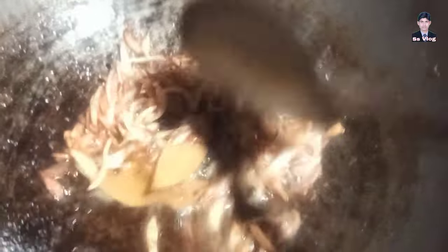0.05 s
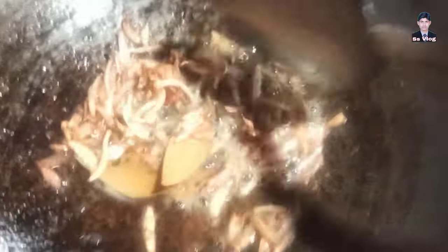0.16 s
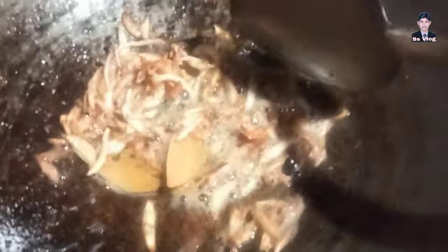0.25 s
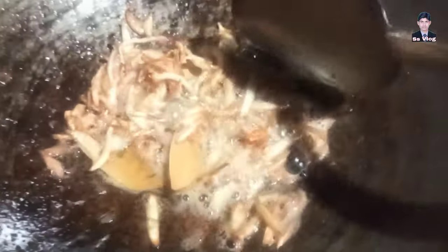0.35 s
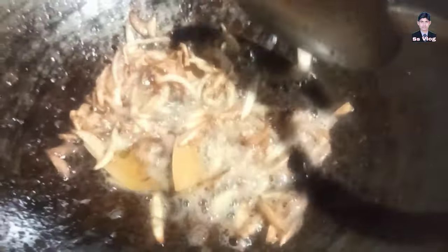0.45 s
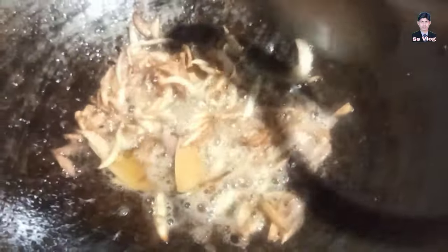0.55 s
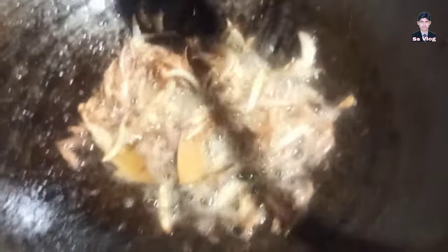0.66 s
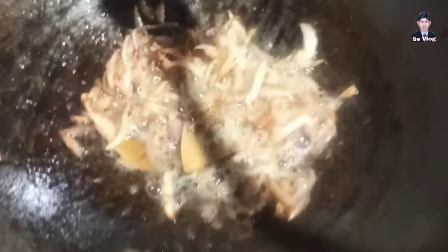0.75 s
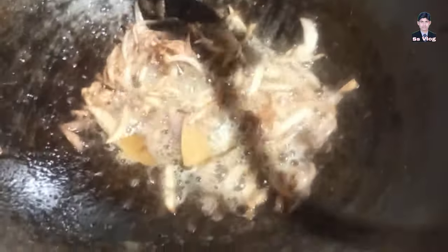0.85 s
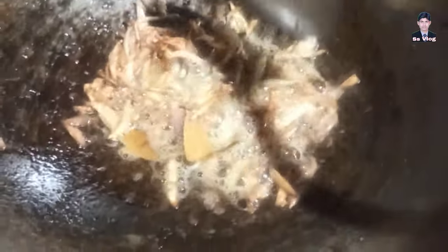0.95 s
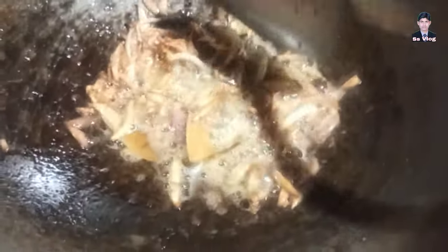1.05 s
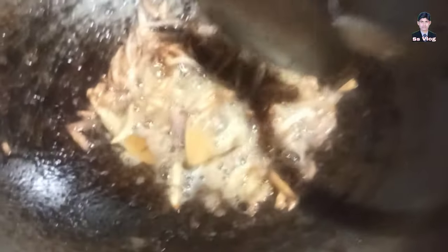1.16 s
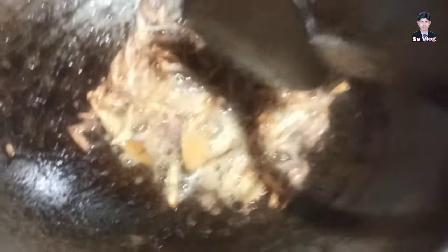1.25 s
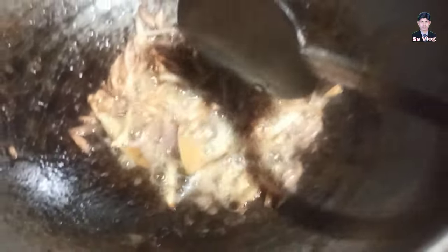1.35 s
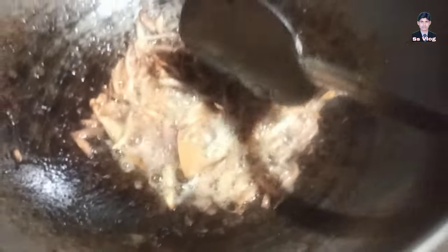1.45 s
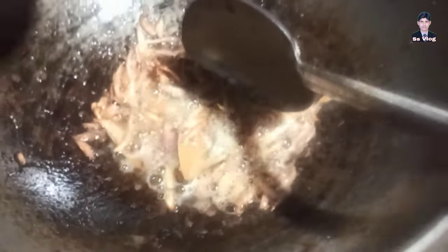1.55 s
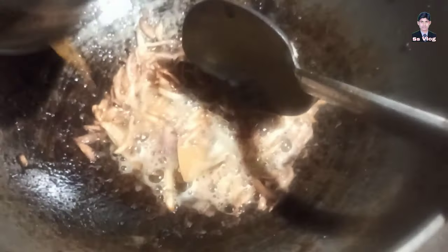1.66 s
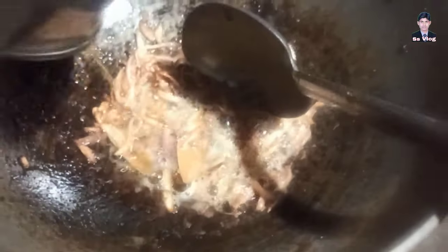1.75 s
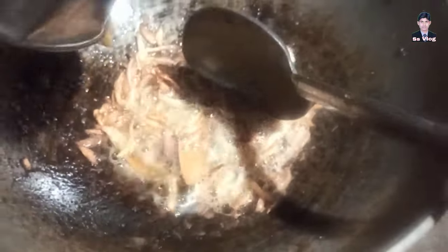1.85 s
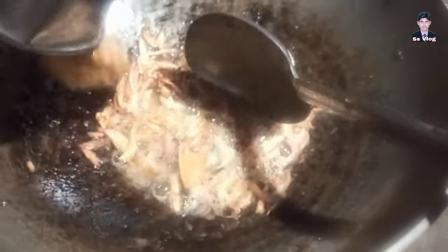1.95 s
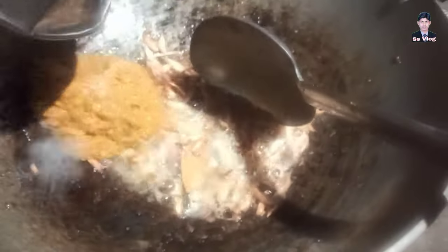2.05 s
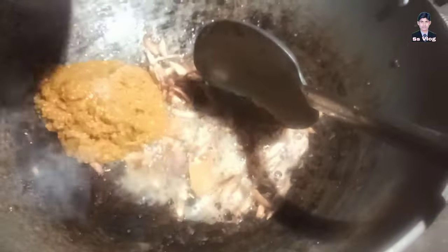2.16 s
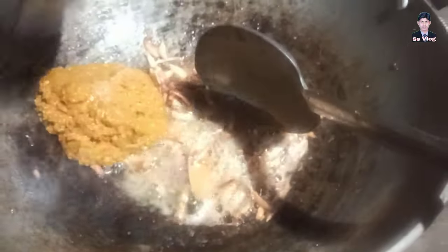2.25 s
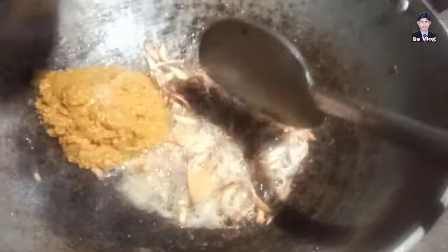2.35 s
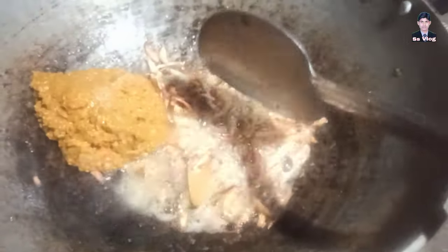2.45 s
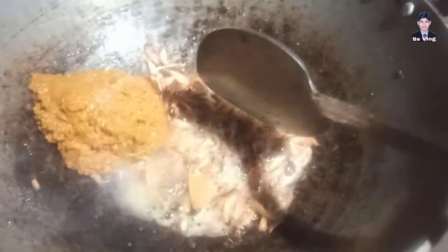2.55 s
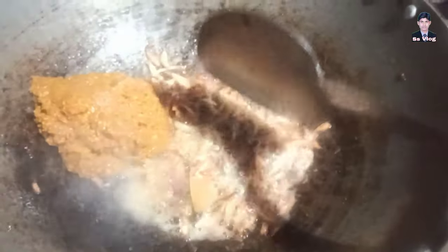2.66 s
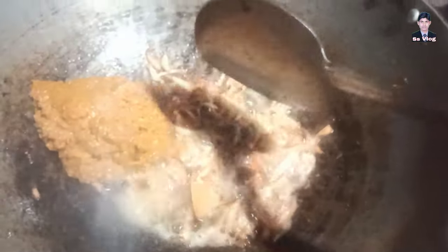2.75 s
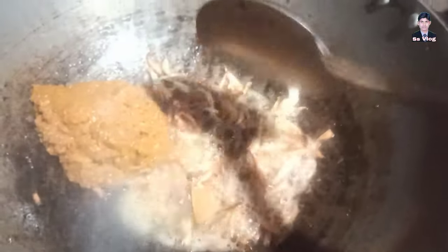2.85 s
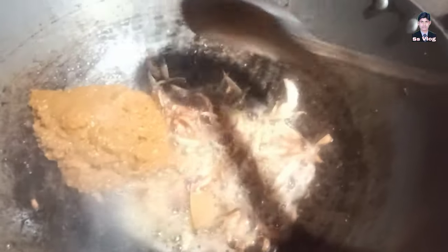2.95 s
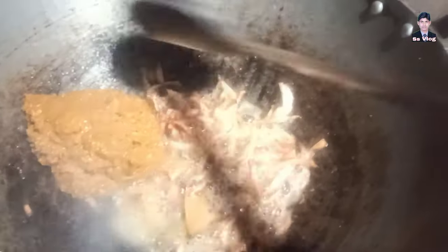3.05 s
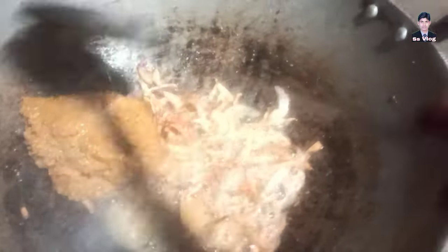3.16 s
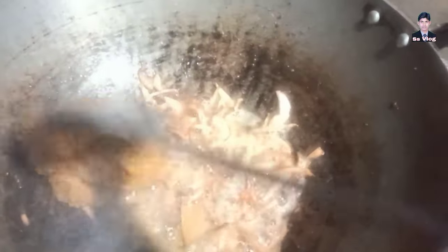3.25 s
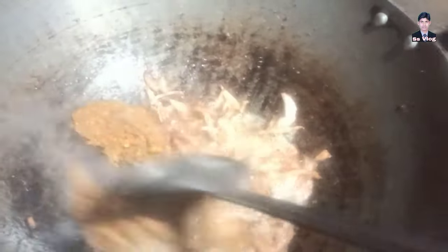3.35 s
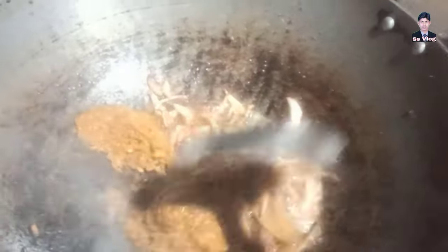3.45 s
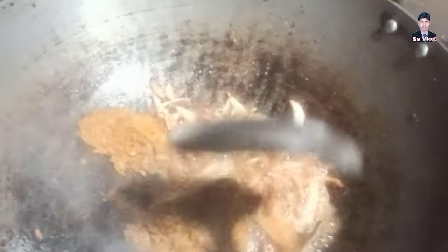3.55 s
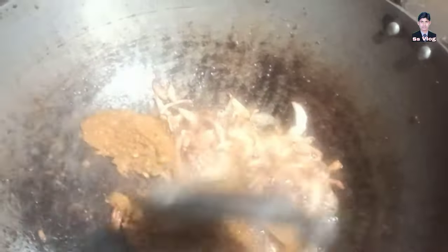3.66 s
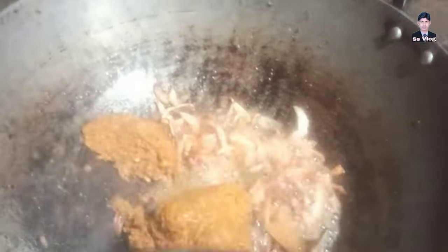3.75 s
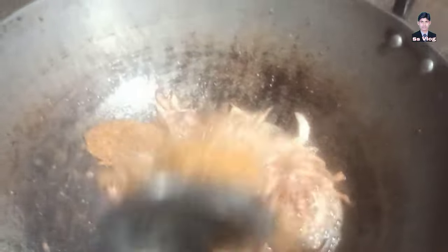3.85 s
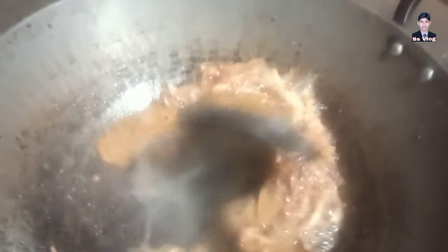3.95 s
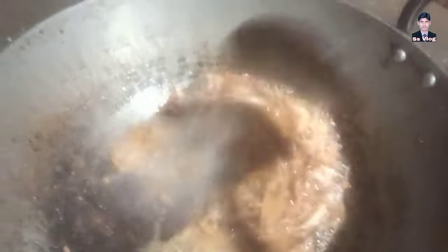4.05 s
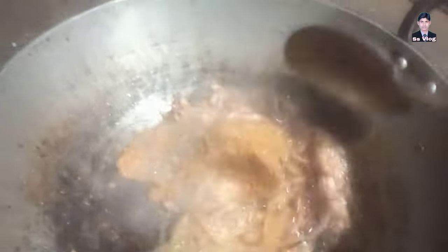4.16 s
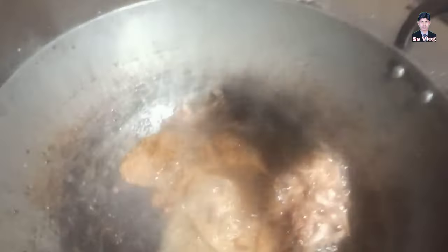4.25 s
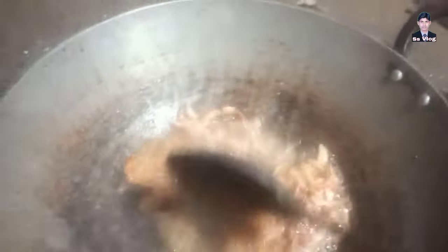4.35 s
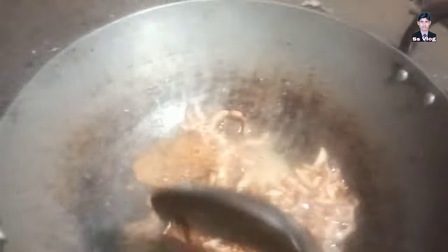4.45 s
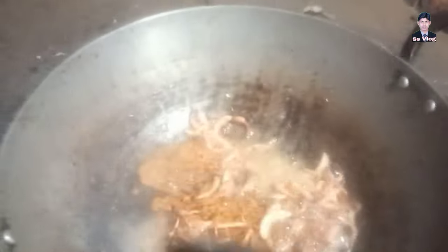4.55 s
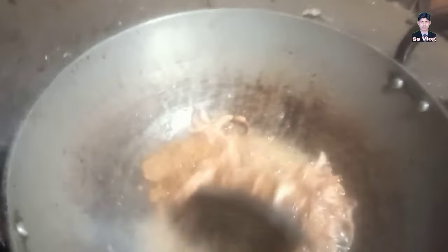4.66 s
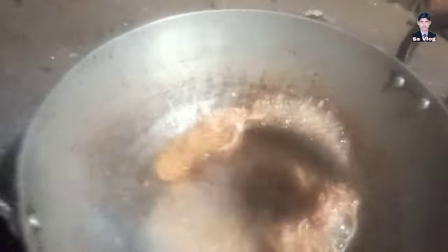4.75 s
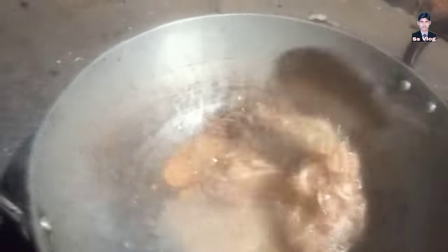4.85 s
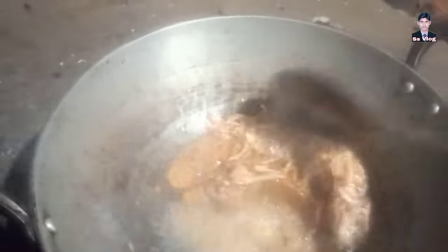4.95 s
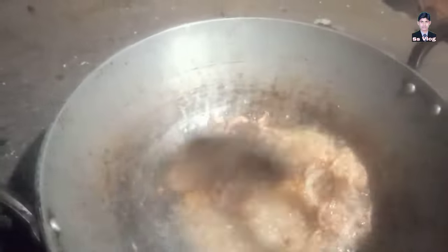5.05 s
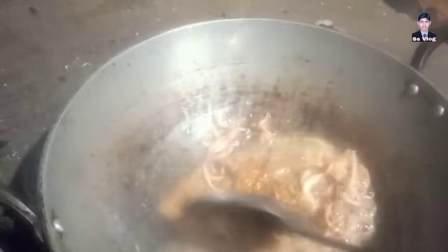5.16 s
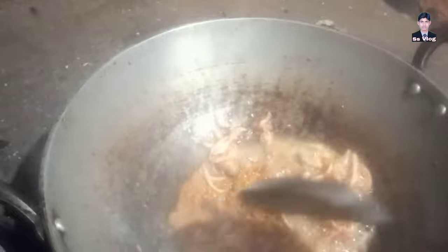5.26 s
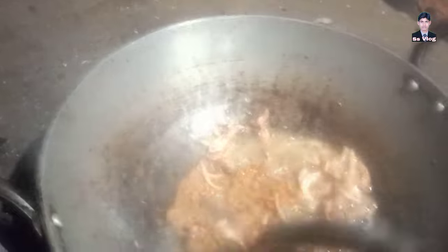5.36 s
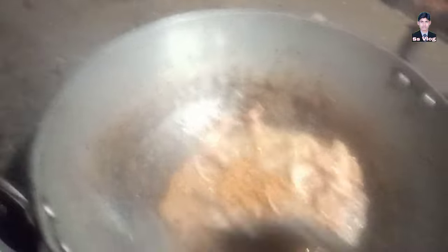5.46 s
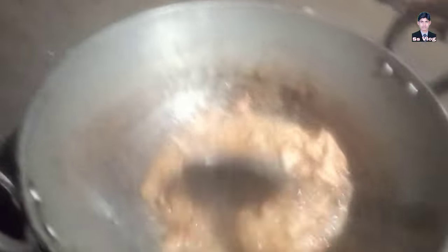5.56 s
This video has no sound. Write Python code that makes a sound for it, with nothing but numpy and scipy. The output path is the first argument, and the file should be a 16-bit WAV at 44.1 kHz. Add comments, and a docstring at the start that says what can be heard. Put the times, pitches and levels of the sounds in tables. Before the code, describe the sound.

Quiet close frying with faint ladle ticks and rapid chirps bursts into a loud, spitting sizzle as paste lands and is stirred with hard metallic knocks.

```python
"""Close on a steel wok: onions fry softly in oil over a low kitchen rush, both as shaped noise.
An insect chirps in double pips (falling tones), and a ladle rubs, ticks and knocks (damped pan modes).
At about two seconds a lump of wet paste knocks into the pan and flares into a crackling sizzle, of random
noise bursts, with bubbling beneath and spits of oil (short rings with noise). Past three seconds the ladle
knocks harder, scrapes and stirs, the wok shifts with dull thuds, and towards the end the paste dries."""
import sys
import numpy as np
from scipy import signal
from scipy.fft import rfft, irfft, next_fast_len
from scipy.io import wavfile
from scipy.ndimage import uniform_filter1d, map_coordinates

SR = 44100
rng = np.random.default_rng(int(sys.argv[2]) if len(sys.argv) > 2 else 0)


def generate_wav(signal):
    """Clip the signal to [-1, 1] and save it as 16-bit WAV at the path in sys.argv[1]."""
    frames = np.transpose(np.atleast_2d(signal))
    scaled = np.clip(frames, -1, 1) * 32767
    pcm = np.round(scaled).astype(np.int16)
    wavfile.write(sys.argv[1], SR, pcm)


N = 246519  # length in samples

# Ladle on the pan, and at 2.168 s the lump of paste landing.
# Each row: start in seconds, peak level in dB, contact time in ms.
KNOCKS = [(0.2353, -30.5, 2.7), (0.884, -38, 4.4), (2.168, -30, 1.4), (3.1981, -1.5, 0.48),
          (3.392, -12, 1.3), (3.493, -12, 2.4), (3.795, -25, 1.8), (3.911, -9.5, 0.55), (4.324, -11.5, 1.8),
          (4.7345, -6, 1.67), (5.1, -12.5, 2.14)]

TOP_HZ = 15650  # upper band limit of the recorder
LAND_S = 2.1  # the paste begins to heat
DRY_FROM_S = 4.39  # once spread out, the paste loses its water
LUMP_DB = -21  # fizz of the resting lump


def amp(db):
    """Decibels to gain."""
    return 10 ** (np.asarray(db) / 20)


def unit(x):
    """Scale to rms 1."""
    return x / np.sqrt(np.mean(x ** 2) + 1e-20)


def wobble(rate):
    """A smooth random curve, rate knots a second."""
    knots = rng.standard_normal(int(N * rate / SR) + 4)
    return map_coordinates(knots, [np.arange(N) * rate / SR])


def add(track, s, sound):
    """Mix a sound in at time s."""
    part = track[max(0, round(s * SR)):][:len(sound)]
    part += sound[:len(part)]


def since(s):
    """Seconds gone by since time s, zero before it."""
    return np.maximum(np.arange(N) / SR - s, 0)


def swell(s, attack, hold, release):
    """Gain that rises from time s, holds, then dies away (all in seconds)."""
    return np.minimum(since(s) / attack, 1) * np.exp(-since(s + attack + hold) / release)


def colour(x, points, size=4096):
    """Causal minimum-phase filter with the given (Hz, dB) spectrum."""
    hz, db = np.transpose(points)
    log_bins = np.log(np.fft.rfftfreq(size, 1 / SR) + 1)
    gain = amp(np.interp(log_bins, np.log(hz), db))
    # folding the cepstrum forward makes the filter causal
    cepstrum = irfft(np.log(gain))
    cepstrum[1:size // 2] *= 2
    cepstrum[size // 2 + 1:] = 0
    impulse = irfft(np.exp(rfft(cepstrum)))
    return signal.fftconvolve(x, impulse)[:N]


def crackle(rate, spread_db, life, hiss_db):
    """Bursts of uneven size, each a tiny dying puff (life in s), over the hiss of countless smaller ones."""
    size = amp(spread_db * np.minimum(rng.standard_normal(N), 2.1))
    bursts = (rng.random(N) < rate / SR) * size ** 2 / rate
    power = signal.lfilter([1], [1, -np.exp(-2 / (life * SR))], bursts)
    envelope = np.sqrt(power / power.mean() + amp(hiss_db) ** 2)
    return unit(envelope * rng.standard_normal(N))


def onions():
    """A fine, even frying: dense small bursts, coloured, with a very slight wobble in level."""
    # Each row: frequency in Hz, level in dB per Hz.
    onion_tone = [(40, -40), (150, -8), (300, -7.5), (430, -5.5), (650, -3), (900, -9.5), (1200, -7.5),
                  (1900, -11.5), (2800, -9.5), (3700, -1.5), (5300, -4.5), (7000, 1.5), (8600, -8.5),
                  (15000, -15.5)]
    grains = crackle(rate=2500, spread_db=1.5, life=0.00057, hiss_db=4.5)
    return amp(-42 + 0.13 * wobble(14.0)) * unit(colour(grains, onion_tone))


def room():
    """The low, steady rush of the stove and kitchen, as coloured noise."""
    # Each row: frequency in Hz, level in dB per Hz.
    room_tone = [(25, -43), (45, -24), (75, -2), (115, 2), (170, -6), (300, -11), (900, -35), (4000, -60)]
    return amp(-58.0) * unit(colour(rng.standard_normal(N), room_tone, size=16384))


def insect(pip_hz=6680, fall_hz_per_s=110000, width=0.0017, gap=.0178, wet_db=-4, t60=0.17):
    """Two wing strokes a chirp, each a short falling pip; nearby walls answer."""
    # Insect chirps. Each row: start in seconds, level in dB before each pip's own offset.
    chirps = [(0.2299, -29.5), (0.3689, -28), (0.46, -27), (0.5777, -26), (0.6886, -28), (0.793, -27.5),
              (0.9058, -24), (1.0212, -25.5), (1.1302, -26), (1.234, -25), (1.3494, -24.5), (1.4626, -24),
              (1.5835, -27), (1.699, -26.5), (1.8166, -25.5), (1.9207, -30)]
    first_pip_db, second_pip_db = -3, -1.5  # the two wing strokes
    out = np.zeros(N)
    t = np.arange(-SR // 200, SR // 200) / SR
    late = np.arange(SR // 8) / SR
    for s, chirp_db in chirps:
        for at, db in ((s, chirp_db + first_pip_db), (s + gap, chirp_db + second_pip_db)):
            # halved because a phase of hz * t falls twice as fast in pitch
            hz = pip_hz + 50 * rng.standard_normal() - fall_hz_per_s * t / 2
            envelope = np.exp(-(t / (width * rng.uniform(0.87, 1.14))) ** 2 / 2)
            pip = envelope * np.sin(2 * np.pi * hz * t)
            walls = rng.standard_normal(len(late)) * amp(-60 * late / t60) * (late > .002)
            walls *= amp(wet_db) / np.linalg.norm(walls)
            walls[0] = 1  # the direct sound
            add(out, at + t[0], amp(db) * signal.fftconvolve(pip, walls))
    return out


def scratches(sharpness=6):
    """The ladle's edge rubs the steel: fast, rough slips excite one resonance of the ladle."""
    # Each row: middle in seconds, rms level in dB before the stroke's taper, pitch in Hz, length in seconds.
    rubs = [(0.236, -38, 3600, 0.0086), (0.255, -43, 13000, .05), (0.621, -52, 514, .02),
            (0.695, -41, 3000, 0.017), (3.232, -23.5, 2400, 0.027), (3.311, -23.5, 2760, 0.027),
            (3.345, -28.5, 1240, .035), (3.379, -21.5, 4170, .09), (3.582, -27, 3480, 0.045),
            (3.67, -25, 4760, 0.13)]
    out = np.zeros(N)
    slips = crackle(rate=1200, spread_db=4, life=.0005, hiss_db=-8)
    for s, db, hz, length in rubs:
        stroke = np.hanning(int(length * SR))
        rough = slips[int(s * SR):][:len(stroke)]
        rasp = signal.lfilter(*signal.iirpeak(hz, sharpness, SR), rough)
        add(out, s - length / 2, amp(db) * stroke * unit(rasp))
    return out


def pan_ring():
    """The pan's short answer to a push, at new mode strengths each time."""
    # Modes of the loaded pan. Each row: frequency in Hz, mean level in dB, 60 dB decay time in seconds.
    modes = [(260, -11.5, 0.084), (328, 4.5, 0.025), (460, 8.5, 0.014), (595, 9.5, 0.023),
             (815, 11.5, 0.0061), (1190, -25, .014)]
    t = np.arange(SR // 10) / SR
    ring = np.zeros(len(t))
    for hz, db, t60 in modes:
        ring += amp(db + rng.standard_normal() - 60 * t / t60) * np.cos(2 * np.pi * hz * t)
    # an open bowl radiates little bass
    return signal.sosfilt(signal.butter(1, 170, "high", fs=SR, output="sos"), ring)


def knocks():
    """Ladle and lump push the pan's modes; food cushions them: a longer contact gives a duller knock."""
    out = np.zeros(N)
    for s, db, contact_ms in KNOCKS:
        push = np.hanning(max(3, int(contact_ms * SR / 1000)))
        knock = np.convolve(push, pan_ring())
        add(out, s, amp(db) * knock / abs(knock).max())
    return out


def scrape():
    """Sticking and slipping after each knock and in the ladle's long push shakes the pan's low modes."""
    drag_db, drag_fade_db_per_s = -23, 193  # level relative to the knock
    push_s, push_db = 3.31, -27  # one long push through the lump
    slip_tone = [(80, -19), (240, 3), (450, -1.5), (1200, -6.5), (3000, 2)]  # Hz, dB per Hz
    slips = colour(crackle(rate=500, spread_db=3.5, life=0.0011, hiss_db=-0.5), slip_tone)
    push = amp(push_db) * swell(push_s, attack=0.052, hold=0.083, release=0.072)
    drags = np.zeros(N)
    for s, db, _ in KNOCKS:
        drags += (since(s) > 0) * amp(db + drag_db - drag_fade_db_per_s * since(s))
    rubbing = unit(signal.fftconvolve(slips, pan_ring())[:N])
    return np.hypot(push, drags) * rubbing


def ticks_and_spits(count=50):
    """Ladle ticks and bursting oil droplets: a noise tick and a very short ring, each at its own pitch."""
    # Ladle ticks (the first three rows), then single spits of oil.
    # Each row: start in seconds, peak level in dB, pitch in Hz.
    placed = [(0.238, -21, 13100), (.4045, -21, 13100), (0.886, -28, 13600), (2.0235, -10, 7500),
              (2.045, -14.5, 4600), (2.129, -14, 4060), (2.2367, -11, 7250), (2.277, -17, 1530),
              (2.2904, -7.5, 4030), (2.379, -11, 7040), (2.411, -10, 7300), (2.576, -7, 3940),
              (3.165, -17, 4230)]
    t60, tick_db = .007, -2  # decay in seconds, noise relative to the ring before filtering
    stray_db, stray_spread_db, stray_hz = -15, 2, 5700
    out, t = np.zeros(N), np.arange(SR // 50) / SR
    strays = []  # more spits of oil, scattered by chance
    for _ in range(count):
        s = rng.uniform(LAND_S, N / SR)
        db = rng.normal(stray_db, stray_spread_db)
        strays.append((s, db, stray_hz * 2 ** rng.uniform(-0.46, 0.53)))
    for s, db, hz in placed + strays:
        tick = amp(tick_db) * rng.standard_normal(len(t))
        burst = (np.sin(2 * np.pi * hz * t) + tick) * amp(-60 * t / t60)
        band = signal.butter(1, [hz / 2, min(2 * hz, TOP_HZ)], "band", fs=SR, output="sos")
        burst = signal.sosfilt(band, burst)
        add(out, s, amp(db) * burst / abs(burst).max())
    return out


def flare():
    """Strength of the fizz, 1 for the resting lump: every wet contact adds its power."""
    # Wet paste meets hot steel, as first drips, the whole lump, then with each stir.
    # Each row: start in seconds, fizz level in dB, hold in seconds.
    contacts = [(1.911, -34, 0.34), (2.003, -29, 0.027), (2.151, -21, 3.5), (3.293, -28.5, .18),
                (3.538, -23.5, 0.45), (3.973, -21, 0.456), (4.571, -19.5, 0.487), (5.39, -28.5, 0.028)]
    power = np.zeros(N)
    for s, db, hold in contacts:
        power += (amp(db - LUMP_DB) * swell(s, 0.0073, hold, 0.063)) ** 2
    return np.sqrt(power)


def boil_db():
    """The paste lands cold, heats up to a full boil, then slowly dries."""
    cold_db, warm_s = 11.5, 0.38  # how much weaker it boils when cold; time constant of heating
    dry_db_per_s = 4.5
    return -cold_db * np.exp(-since(LAND_S) / warm_s) - dry_db_per_s * since(DRY_FROM_S)


def bowl(x, echo_db=-17, count=7):
    """The wok's walls send back weak, quick echoes that shift as the food moves."""
    out = x.copy()
    for delay in rng.uniform(.001, .009, count):
        add(out, delay, amp(echo_db) * wobble(1.476) * x)
    return unit(out)


def paste():
    """Water flashes to steam at the paste's edge, fine and coarse, and bubbles through its bulk."""
    # Spectra of the fine fizz, the larger droplets and the bubbles.
    # Each row: frequency in Hz, level in dB per Hz.
    sizzle_tone = [(300, -59), (3000, -28), (4600, -34), (5300, -5), (6400, -1), (7000, -3), (7500, 2.5),
                   (7900, -6), (8500, -5), (11000, -14.5), (13500, -9.5), (15500, -10)]
    spatter_tone = [(300, -39), (2500, -26), (3300, -8.5), (3650, 0), (3950, 1.5), (4500, -1.5),
                    (5200, -4.5), (7000, -2.5), (15000, -30.5)]
    bubble_tone = [(40, -33), (180, -15), (350, -16.5), (520, -4.5), (680, 1), (800, -3.5), (930, -9),
                   (1230, -0.5), (1550, -5.5), (1900, -3.5), (2200, -5), (3100, -1), (4200, -1.5),
                   (7000, -43.5)]
    bursts_per_s, bursts_grow = 2300, 1.4  # burst rate of the resting lump; power law of rate on fizz
    surge_db, surges_per_s = 0.52, 13  # the fizz is never quite even
    finer_db_per_s, fine_hz = 2.5, 9900  # drying paste fizzes finer: its top grows
    spatter_db, spatter_follows, spatter_boils = -21.5, 0.4, 0.64  # share of fizz's and boil's swings
    bubble_db, bubble_follows = -27, 1.13  # level at full boil; how steeply it falls for weaker fizz

    strength = flare() * amp(surge_db * wobble(surges_per_s))
    boil = boil_db()
    rate = bursts_per_s * np.maximum(strength, .3) ** bursts_grow
    flurry = wobble(70)  # droplets burst in clumps
    fizz = crackle(rate, spread_db=3.5, life=0.003, hiss_db=-9.5) * amp(0.9 * flurry)
    drops = crackle(rate * 0.4, spread_db=4.5, life=0.00057, hiss_db=-4) * amp(0.34 * flurry)
    pops = crackle(rate * .3, spread_db=6.0, life=0.00048, hiss_db=0.5) * amp(0.67 * flurry)

    sizzle = amp(LUMP_DB) * strength * bowl(colour(fizz, sizzle_tone))
    finest = signal.sosfiltfilt(signal.butter(4, fine_hz, "high", fs=SR, output="sos"), sizzle)
    sizzle = sizzle + (amp(finer_db_per_s * since(DRY_FROM_S)) - 1) * finest

    spatter_gain = amp(spatter_db + spatter_boils * boil) * strength ** spatter_follows
    spatter = spatter_gain * bowl(colour(drops, spatter_tone))

    bubble_gain = amp(bubble_db + boil) * np.minimum(strength, 1) ** bubble_follows
    bubbling = bubble_gain * bowl(colour(pops, bubble_tone))
    return sizzle + spatter + bubbling


def thuds(push=0.003):
    """The wok shifts on its stand: one slow push (time scale in s) and rebound of the whole wok."""
    # Each row: start in seconds, peak level in dB.
    shifts = [(3.197, -38), (3.906, -36)]
    out, u = np.zeros(N), np.arange(SR // 10) / SR / push
    for s, db in shifts:
        pulse = u * (2 - u) * np.exp(-u)
        add(out, s, amp(db) * pulse / pulse.max())
    return out


def dips(length=0.044):
    """Gain that dips briefly (length in s) at set times, by a few knocks."""
    # Each row: start in seconds, depth in dB.
    dip_rows = [(3.198, 1), (3.493, 4.5), (3.91, 5.5)]
    dip_db = np.zeros(N)
    for s, depth_db in dip_rows:
        add(dip_db, s, -depth_db * signal.windows.tukey(int(length * SR)))
    return amp(dip_db)


def stirs():
    """Wet onions slide and squelch ahead of the ladle: dense bursts under slow swells."""
    # The ladle sweeps the wet food. Each row: start in seconds, rms level in dB, hold in seconds.
    sweeps = [(3.34, -30.5, .17), (3.767, -29, 0.12), (4.357, -29.5, 0.091), (4.533, -36, 0.17)]
    # Each row: frequency in Hz, level in dB per Hz.
    stir_tone = [(200, -22), (600, 0.5), (950, -6.5), (1350, 1), (2200, -4), (5000, -13.5)]
    strokes = sum(amp(db) * swell(s, 0.043, hold, 0.066) for s, db, hold in sweeps)
    squelch = crackle(rate=1600, spread_db=1, life=0.0012, hiss_db=-1.5)
    return strokes * bowl(colour(squelch, stir_tone))


def scene():
    """Everything at one close microphone."""
    contacts = knocks() + thuds() + scrape() + scratches()
    wet_food = (paste() + stirs()) * dips()
    return (onions() + wet_food + ticks_and_spits() + contacts + insect() + room())[None]


def record(dry, ceiling=0.64):
    """The recorder rounds the tallest peaks; its treble is uneven and ends at a band limit."""
    # Hollows in the recorder's treble. Each row: low edge in Hz, high edge in Hz, depth in dB.
    # A row whose low edge lies above its high edge has no effect.
    hollows = [(4687, 6133, -7), (7750, 7200, -3), (8490, 11590, -18), (12380, 9900, -4)]
    rounded = dry / (1 + (dry / ceiling) ** 4) ** (1 / 4)
    size = next_fast_len(N + SR // 2)
    hz = np.fft.rfftfreq(size, 1 / SR)
    db = sum(depth_db * ((hz >= low) & (hz < high)) for low, high, depth_db in hollows)
    gain = uniform_filter1d(amp(db) * (hz < TOP_HZ), size=600)  # softens the edges
    return irfft(rfft(rounded, size) * gain, size)[:, :N]


dry = scene()
out = record(dry)
generate_wav(out)
```